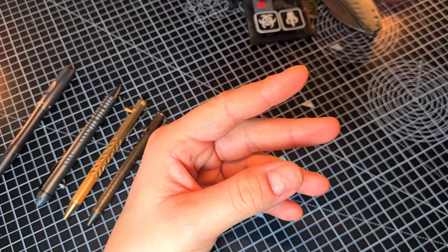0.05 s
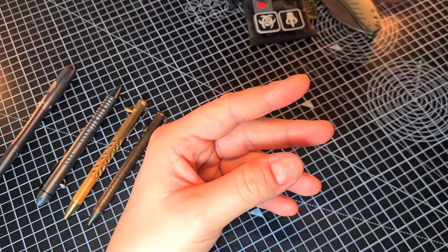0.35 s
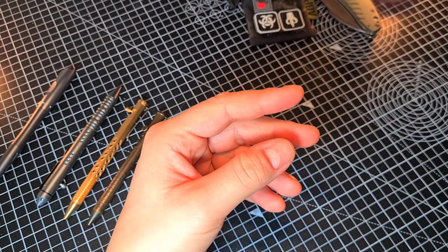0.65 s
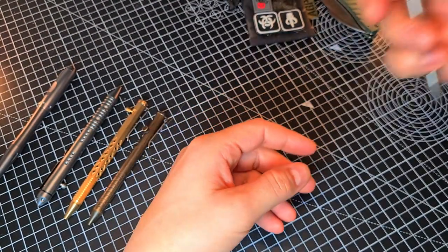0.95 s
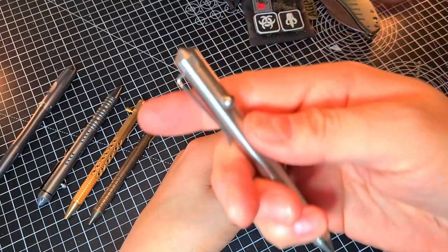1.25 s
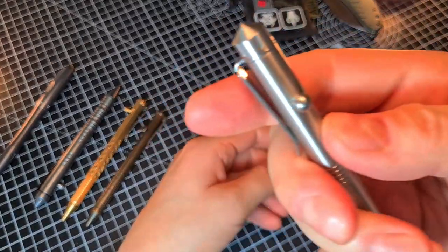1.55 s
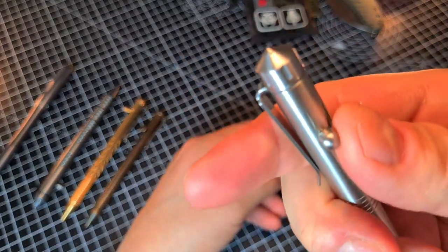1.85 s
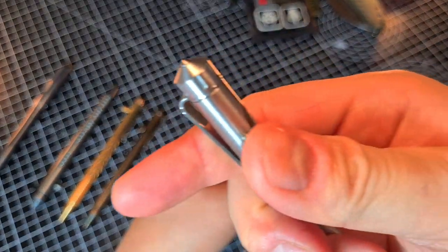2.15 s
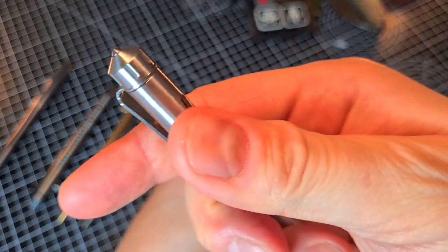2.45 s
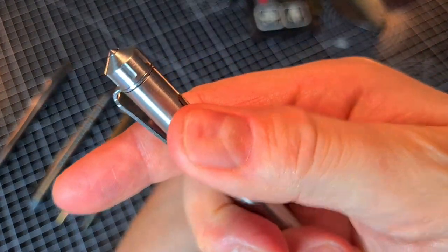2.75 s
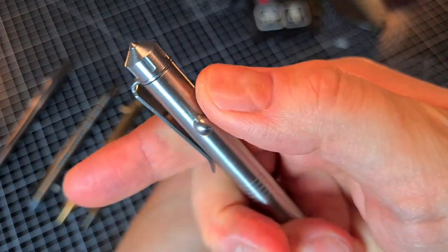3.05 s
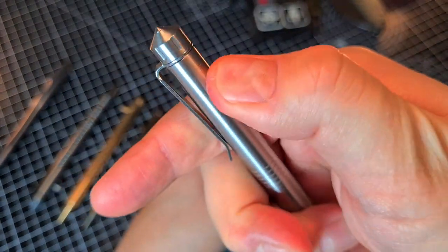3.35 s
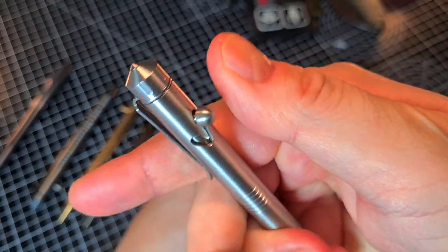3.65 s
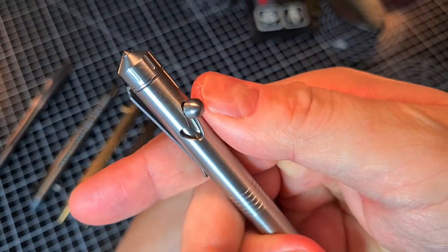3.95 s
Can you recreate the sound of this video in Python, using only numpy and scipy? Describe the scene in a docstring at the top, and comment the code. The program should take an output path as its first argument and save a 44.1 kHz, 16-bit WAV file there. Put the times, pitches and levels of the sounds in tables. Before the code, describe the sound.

A steel bolt-action pen clicks once, sharp and ringing. Before that, it is picked up from a mat with soft scuffs and a low thump, and fingers rustle and tap on it, close by in a small room.

```python
"""Soft scuffs and a low thump: a steel bolt-action pen is picked up from a cutting mat, close by in a
small room. Fingers rustle and tap on the barrel as they turn it. The thumb eases the bolt out of its
notch with a few ticks; the spring drives it down the barrel into its stop with one sharp, ringing click.
Behind it lie a low rumble, hiss and a faint electrical whine."""
import sys
import numpy as np
from scipy import signal
from scipy.fft import rfft, irfft, next_fast_len
from scipy.io import wavfile
from scipy.ndimage import map_coordinates

SR = 44100
rng = np.random.default_rng(int(sys.argv[2]) if len(sys.argv) > 2 else 0)


def store_wav(level_fs):
    """Save 16-bit WAV to argv[1]."""
    pcm = np.round(np.clip(np.atleast_2d(level_fs), -1, 1) * 32767)
    wavfile.write(sys.argv[1], SR, pcm.T.astype(np.int16))


N = 176400


def bolt_stop():
    """The click, steel on steel: a brief chattering contact, a dying crack and the pen's ring."""
    # the bolt hitting its stop, a rebound, then a quick echo off the desk: t/s, level/dB
    clicks = [(3.5094, -17), (3.5165, -31.5), (3.5199, -33)]
    # tone of the blow: f/Hz, level/dB
    blow_colour = [(180, -47), (500, -11.5), (1900, -5), (2470, 6.5), (3300, -8.5), (5300, -4), (7000, 2.5),
                   (9140, -10), (11000, -0.5), (13200, 1.5), (15500, 3)]
    contact_s, crack_db, crack_t60_s, ring_db = 0.00093, -11, 0.082, -18.5
    out, t = np.zeros(N), np.arange(SR // 3) / SR
    for s, db in clicks:
        force = (t < contact_s) + amp(crack_db - 60 * t / crack_t60_s)
        chatter = coloured(force * rng.standard_normal(len(t)), blow_colour)
        blow = unit(chatter) * np.sqrt(2 * contact_s / t[-1])
        add(out, s, amp(db) * (blow + amp(ring_db) * steel_ring(t)))
    return out


def steel_ring(t):
    """The pen rings freely after a blow, with a slightly different balance of modes each time."""
    # the pen's modes: f/Hz, level/dB, t60/s
    modes = [(2434, 13, 0.017), (2450, 0.5, 0.08), (4808, 5, 0.043), (5400, -11, .06), (6430, -8, 0.127),
             (8560, -4, .1), (9300, -2, 0.12), (12660, -6.5, 0.056)]
    return sum(amp(db + rng.normal(0, 1) - 60 * t / t60) * np.sin(2 * np.pi * (hz * t + rng.random()))
               for hz, db, t60 in modes)


def bolt_slides():
    """Dense slips grow as the bolt gathers speed; it rattles the barrel, which starts to ring."""
    # strokes of the bolt: t/s, length/s, scrape level/dB, scrape growth/dB, rattle level/dB
    strokes = [(3.356, 0.014, -39, 6, -54.5), (3.4827, 0.008, -41, 20, -48), (3.4901, .019, -29, 9, -29)]
    # tone of the sliding bolt: f/Hz, level/dB
    slide_colour = [(2800, -30.5), (4000, -16.5), (4800, -6.5), (5400, -2), (6300, -6), (7200, -21.5),
                    (15500, -27)]
    # tone of the rattling barrel: f/Hz, level/dB
    rattle_colour = [(500, -39), (1600, -36), (2470, -7), (3400, -9.5), (4500, -5), (7800, -9.5), (9000, 0),
                     (10300, -10), (12100, 0.5), (13700, -15), (15500, -17)]
    rattle_growth_db, ring_db = 13, -7.5
    scrape, rattle, t = np.zeros(N), np.zeros(N), np.arange(SR // 20) / SR
    for s, length, db, growth_db, rattle_db in strokes:
        travel, moving = np.minimum(t / length, 1), t < length
        slips = moving * amp(growth_db * travel) * grains(len(t), per_s=3800)
        knocks = moving * amp(rattle_growth_db * travel) * grains(len(t), per_s=14000)
        length_gain = np.sqrt(length / t[-1])  # the level holds over the stroke alone
        add(scrape, s, amp(db) * unit(coloured(slips, slide_colour)) * length_gain)
        add(rattle, s, amp(rattle_db) * unit(coloured(knocks, rattle_colour)) * length_gain)
    ring = signal.fftconvolve(rattle, steel_ring(np.arange(SR // 4) / SR))[:N]
    return scrape + rattle + amp(ring_db) * rattle.std() * unit(ring)


def bolt_ticks():
    """The bolt catches in its slot: each tick is a few cycles of ring with a bright, noisy edge."""
    # catches: t/s, ring peak/dB, ring f/Hz, edge against ring/dB
    catches = [(2.7136, -32.5, 5250, -8.5), (3.4329, -32, 4920, 0), (3.467, -38, 5240, -20),
               (3.4992, -22, 5140, -14), (3.5049, -20.5, 5500, -14.5), (3.361, -31.5, 5320, -16)]
    half_width_s = 0.00053
    out, t = np.zeros(N), np.arange(-SR // 200, SR // 200) / SR
    pulse = np.exp(-(t / half_width_s) ** 2)
    for s, db, hz, edge_db in catches:
        ring = pulse * np.sin(2 * np.pi * hz * t)
        edge = peaked(resonant(pulse * rng.standard_normal(len(t)), hz=5600, width_hz=5200))
        add(out, s + t[0], amp(db) * (ring + amp(edge_db) * edge))
    return out


def pick_up():
    """The pen scuffs over the mat, the desk rings briefly and the hand lands with soft thumps."""
    # scuffs on the mat: t/s, scrape level/dB, attack/s, t60/s, hollow body level/dB
    scuffs = [(.1, -44, 0.0057, 0.15, -72), (0.141, -41, 0.0039, 0.092, -70),
              (0.184, -43, 0.0074, 0.19, -47), (.199, -32, 0.0023, 0.12, -36.5)]
    # tone of the scrape: f/Hz, level/dB
    scrape_colour = [(130, -24.5), (600, -2), (1100, 3.5), (2000, -2), (2600, -9.5), (3200, -9),
                     (5000, -18.5), (9000, -32.5)]
    # tone of the hollow body under it: f/Hz, level/dB
    body_colour = [(200, -18), (335, 7.5), (470, -5), (620, -1), (800, -20), (5000, -60)]
    # the hand settling on the desk: t/s, peak/dB
    thumps = [(0.404, -30), (0.571, -48)]
    desk_s, desk_hz, desk_db = 0.208, 614, -28
    thump_hz, soft_attack_s = 70, 0.0108
    out, t = np.zeros(N), np.arange(SR // 3) / SR
    for s, db, attack_s, t60, body_db in scuffs:
        scrape = unit(coloured(grains(len(t), per_s=4000), scrape_colour))
        body = unit(coloured(rng.standard_normal(len(t)), body_colour))
        add(out, s, amp(db) * scrape * swell(t, attack_s, t60))
        add(out, s, amp(body_db) * body * swell(t, 2 * attack_s, 1.7 * t60))
    desk = swell(t, soft_attack_s, t60=0.083) * np.sin(2 * np.pi * desk_hz * t)
    add(out, desk_s, amp(desk_db) * desk)
    thump = swell(t, soft_attack_s, t60=0.085) * np.sin(2 * np.pi * thump_hz * t)
    for s, db in thumps:
        add(out, s, amp(db) * thump)
    return out


def finger_taps():
    """Fingers tap the barrel: a damped knock, a crisp upper ring and the soft pat of skin."""
    # taps: t/s, peak/dB, knock f/Hz, skin against knock/dB
    taps = [(.9018, -42, 1840, -15), (1.028, -43.5, 1650, -7), (1.061, -38, 1770, 4),
            (1.513, -49.5, 980, -5), (1.728, -43, 1790, -21), (1.797, -39.5, 1800, 3),
            (1.827, -32.5, 1750, 9.5), (2.022, -46.5, 2000, 8), (2.06, -42.5, 1840, 0.5)]
    # tone of the skin: f/Hz, level/dB
    skin_colour = [(90, 5.5), (200, -2.5), (800, 2), (1300, -16.5), (1900, -14), (3000, -9), (12000, -34.5)]
    edge_db = -10.5
    out, t = np.zeros(N), np.arange(SR // 10) / SR
    for s, db, hz, skin_db in taps:
        on_barrel, on_skin = rng.standard_normal((2, len(t))) * swell(t, attack_s=0.0017, t60=0.014)
        knock = unit(resonant(on_barrel, hz, width_hz=800))
        edge = unit(resonant(on_barrel, hz=3530, width_hz=800))
        skin = unit(coloured(on_skin, skin_colour))
        add(out, s, amp(db) * peaked(knock + amp(edge_db) * edge + amp(skin_db) * skin))
    return out


def handling():
    """The moving hand: a grainy, uneven rustle, small snags of skin and a hollow rub on the mat."""
    # hand and sleeve rustling: t/s, level/dB
    rustle_curve = [(.09, -68.5), (.11, -60.5), (.25, -50), (.33, -58.5), (.41, -51), (.52, -64),
                    (.59, -59), (.81, -49.5), (.88, -55.5), (.95, -50.5), (1.07, -53.5), (1.21, -55.5),
                    (1.33, -73.5), (1.62, -70), (1.82, -60.5), (1.96, -70), (2.06, -65), (2.34, -69.5),
                    (2.5, -77), (3.9, -95.5)]
    # tone of the rustle: f/Hz, level/dB
    rustle_colour = [(60, -1.5), (130, 9.5), (300, 3), (700, -3.5), (1400, -6.5), (2200, -8.5), (3200, -14),
                     (7000, -18), (10000, -27.5)]
    # the rub on the mat: t/s, level/dB
    rub_curve = [(.2, -69), (.24, -52), (.32, -52.5), (.36, -55), (.42, -52), (.54, -69), (1.23, -57.5),
                 (1.33, -83), (1.62, -61), (2.1, -83.5), (4, -120)]
    flutter_per_s, flutter_db, grain_db, snag_db = 23, 1.5, -6, -13.5
    knots = np.arange(N) * flutter_per_s / SR
    flutter = amp(flutter_db * map_coordinates(rng.standard_normal(N // 100), [knots]))
    friction = rng.standard_normal(N) + amp(grain_db) * unit(grains(N, per_s=500))
    snags = resonant(grains(N, per_s=110), hz=1875, width_hz=690)
    rub = resonant(rng.standard_normal(N), hz=660, width_hz=316)
    rustle = flutter * unit(coloured(friction, rustle_colour)) + amp(snag_db) * unit(snags)
    return fader(rustle_curve) * rustle + fader(rub_curve) * unit(rub)


def room(x):
    """Quick reflections off the desk, then the small room's short tail, its treble dying first."""
    # decay of the room: f/Hz, t60/s
    decay = [(200, 0.36), (2500, 0.31), (6000, 0.25), (15000, 0.22)]
    early_db, tail_db = -9.5, -13.5
    hz, frame_s, spectrum = signal.stft(rng.standard_normal(SR // 2), SR, nperseg=256)
    fade = amp(-60 * frame_s / along(decay, hz)[:, None])
    tail = signal.istft(spectrum * fade, SR, nperseg=256)[1]
    t = np.arange(len(tail)) / SR
    early = grains(len(t), per_s=2200) * swell(t, attack_s=0.00045, t60=0.05)
    response = amp(tail_db) * tail / np.linalg.norm(tail) + amp(early_db) * early / np.linalg.norm(early)
    return signal.fftconvolve(x, response)[:N]


def background():
    """A bed of swelling low rumble, steady microphone hiss and a thin electrical whine."""
    # rise and fall of the rumble: t/s, level/dB
    rumble_curve = [(0, -56), (.5, -63), (1.13, -50), (1.27, -66), (1.38, -56), (1.98, -65.5), (2.03, -50),
                    (2.16, -59.5), (2.25, -48), (2.42, -60), (2.56, -55), (4, -65)]
    # tone of the rumble: f/Hz, level/dB
    rumble_colour = [(22, -40.5), (48, -2), (68, -1.5), (90, -12.5), (400, -43), (2000, -87)]
    # tone of the hiss: f/Hz, level/dB
    hiss_colour = [(100, 2.5), (1200, -2), (2300, -8), (3100, 0.5), (6200, 0.5), (7500, -6.5), (9200, -2.5),
                   (12000, -7), (15000, -3)]
    hiss_db, partial_db, whine_hz, harmonics = -65, -83.5, 1000, range(4, 11)
    t = np.arange(N) / SR
    rumble = fader(rumble_curve) * unit(coloured(rng.standard_normal(N), rumble_colour))
    hiss = amp(hiss_db) * unit(coloured(rng.standard_normal(N), hiss_colour))
    whine = sum(np.sin(2 * np.pi * (k * whine_hz * t + rng.random())) for k in harmonics)
    return rumble + hiss + amp(partial_db) * np.sqrt(2) * whine


def amp(db):
    return 10 ** (np.asarray(db) / 20)


def unit(x):
    """x at an RMS of one."""
    return x / np.sqrt(np.mean(x ** 2) + 1e-20)


def peaked(x):
    """x at a peak of one."""
    return x / np.abs(x).max()


def along(points, hz):
    """Read a curve of (f/Hz, value) points on a log frequency axis."""
    f, values = np.transpose(points)
    return np.interp(np.log(hz + 1), np.log(f + 1), values)


def fader(points):
    """Gain per sample from (t/s, level/dB) points."""
    return amp(np.interp(np.arange(N) / SR, *np.transpose(points)))


def add(out, s, x):
    """Mix x into out at time s."""
    i = round(s * SR)
    out[i:i + len(x)] += x[:len(out) - i]


def coloured(x, points):
    """x through an EQ curve of (f/Hz, level/dB) points; minimum phase keeps the attacks sharp."""
    size = 2 * next_fast_len(len(x) // 2 + 2048)
    cepstrum = irfft(np.log(amp(along(points, np.fft.rfftfreq(size, 1 / SR)))))
    cepstrum[1:size // 2] *= 2
    cepstrum[size // 2 + 1:] = 0
    return irfft(rfft(x, size) * np.exp(rfft(cepstrum)))[:len(x)]


def resonant(x, hz, width_hz):
    """x twice through a resonance of the given width, for steeper skirts."""
    b, a = signal.iirpeak(hz, hz / width_hz, SR)
    return signal.lfilter(b, a, signal.lfilter(b, a, x))


def grains(count, per_s):
    """Tiny clicks of random size at random moments."""
    return (rng.random(count) < per_s / SR) * rng.standard_normal(count)


def swell(t, attack_s, t60):
    """A straight rise, then an exponential fall of 60 dB in t60 seconds."""
    return np.minimum(t / attack_s, 1) * amp(-60 * np.maximum(t - attack_s, 0) / t60)


def scene():
    """Pen and hand up close in the room, over the background, in mono."""
    near = bolt_ticks() + bolt_slides() + bolt_stop() + pick_up() + finger_taps() + handling()
    return (near + room(near) + background())[None]


def record(dry):
    """A steep low-pass takes off the very top of the treble."""
    top_hz = 15830
    return signal.fftconvolve(dry, signal.firwin(401, top_hz, fs=SR)[None], mode="same", axes=1)


dry = scene()
out = record(dry)
store_wav(out)
```